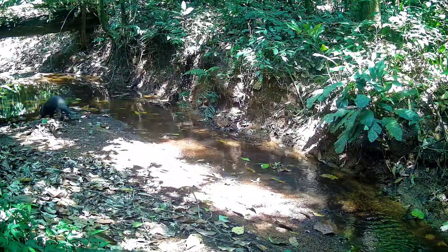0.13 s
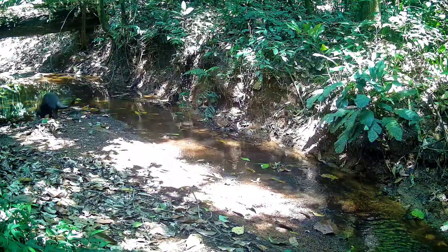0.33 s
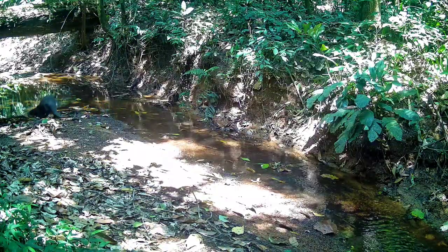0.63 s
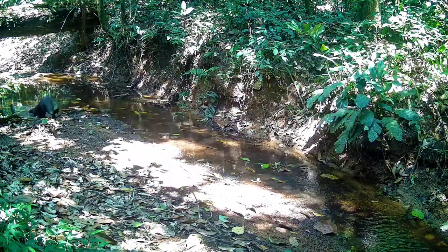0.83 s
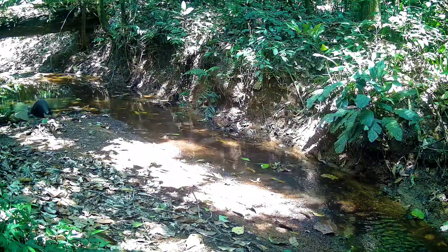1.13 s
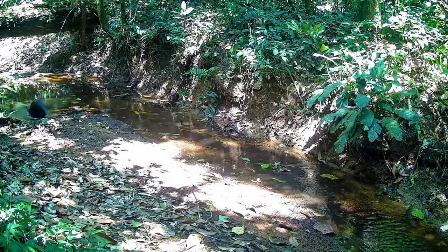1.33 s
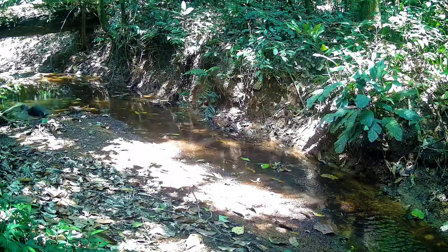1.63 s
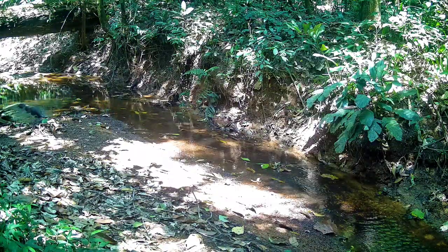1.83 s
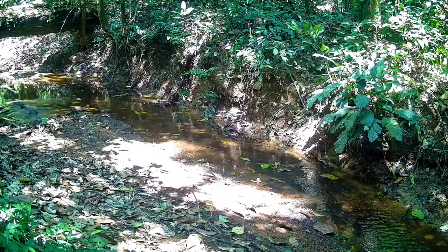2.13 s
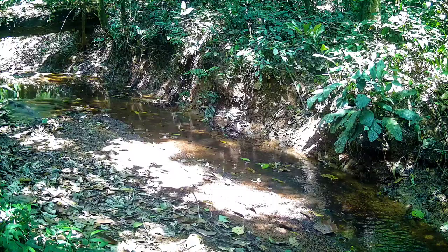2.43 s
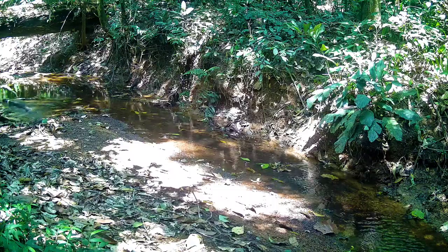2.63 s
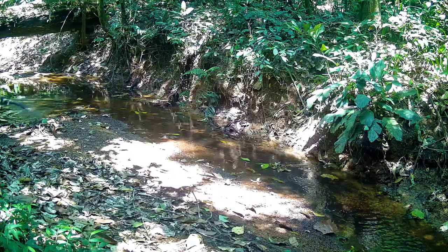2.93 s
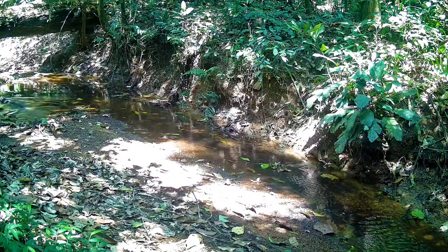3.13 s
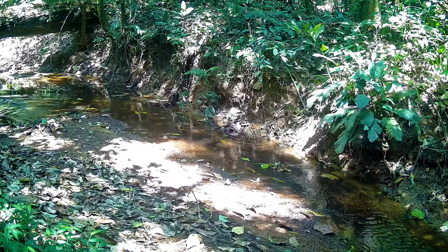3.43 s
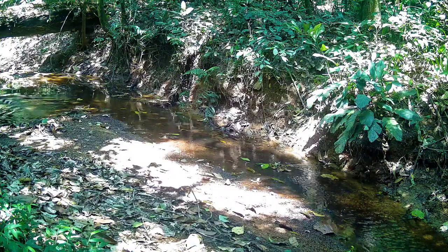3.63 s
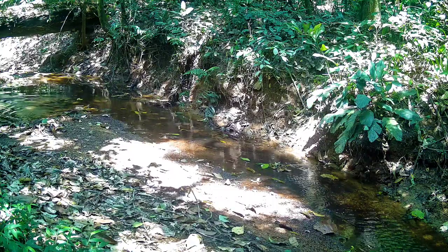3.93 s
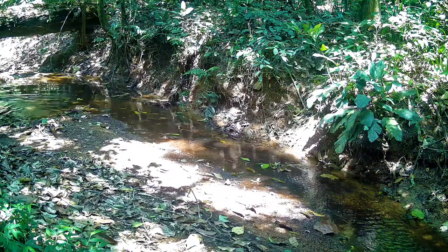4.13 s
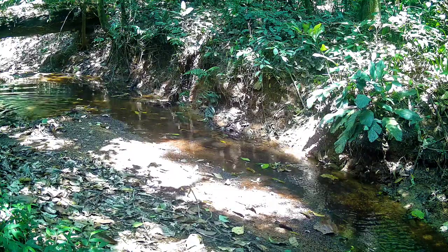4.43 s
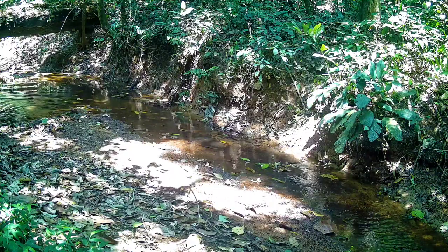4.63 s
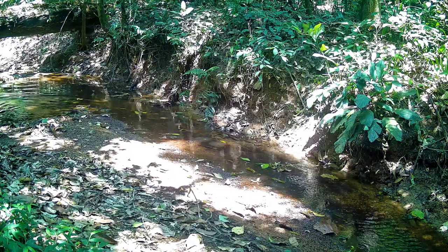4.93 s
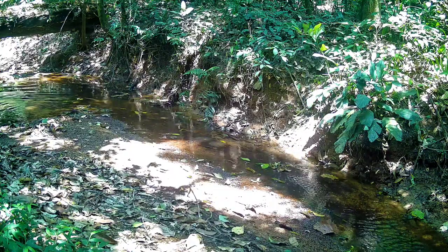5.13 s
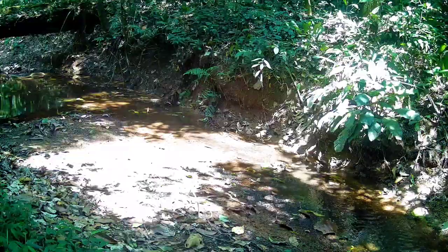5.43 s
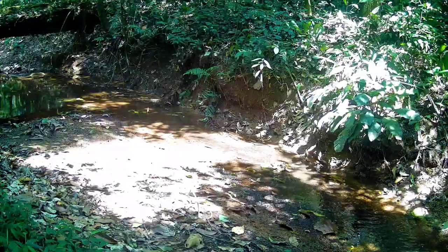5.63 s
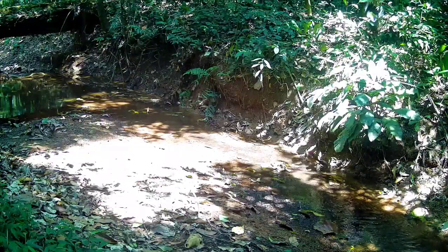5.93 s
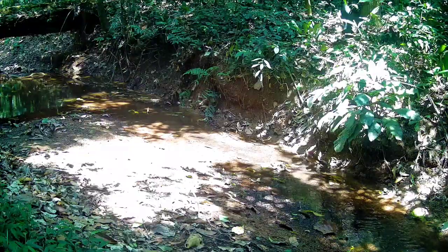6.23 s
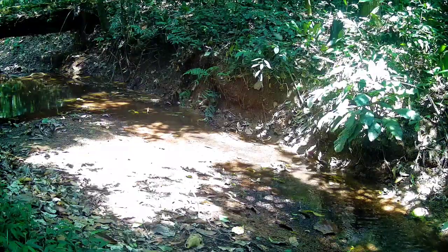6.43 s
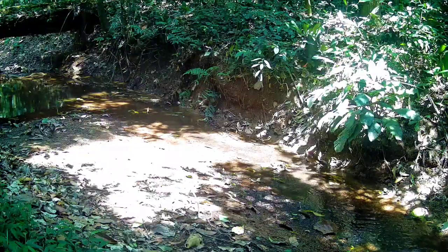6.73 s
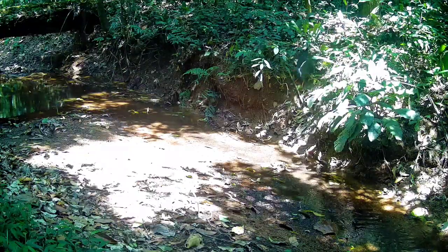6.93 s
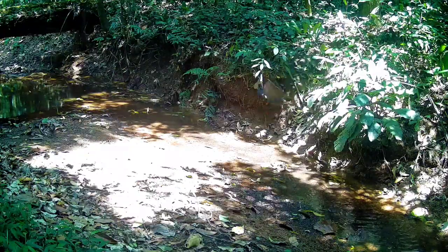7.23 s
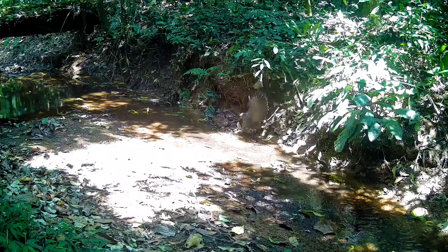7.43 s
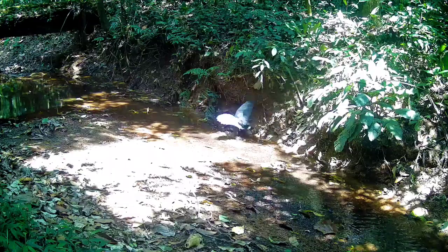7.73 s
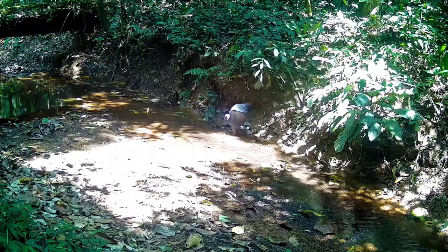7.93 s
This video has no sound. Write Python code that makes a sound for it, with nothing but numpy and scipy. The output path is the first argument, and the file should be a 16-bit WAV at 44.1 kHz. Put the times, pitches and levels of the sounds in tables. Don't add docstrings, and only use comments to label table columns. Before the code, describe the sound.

A dense, high cicada trill holds steadily over a very faint creek. Near the start a close bird gives three quick, descending chips with woodland echo, followed by faint far whistles and soft chips. Around five and a half seconds the trill stops dead with a tiny click. Quiet water remains, with a bird's airy wing swishes, crisp leaf rustles, small twig ticks and a hollow plop. Small narrow-band camera microphone.

```python
import sys
import numpy as np
from scipy import signal
from scipy.fft import rfft, irfft, next_fast_len
from scipy.io import wavfile
from scipy.ndimage import uniform_filter1d

SR = 44100
rng = np.random.default_rng(int(sys.argv[2]) if len(sys.argv) > 2 else 0)


def wav_out(sig):
    wavfile.write(sys.argv[1], SR, np.round(np.clip(np.atleast_2d(sig).T, -1, 1) * 32767).astype(np.int16))


def invert_db(level):
    return 10 ** (np.asarray(level, dtype=float) / 20)


N = 356107
T = np.arange(N) / SR


def shape(x, points):
    hz, db = np.transpose(points)
    size = next_fast_len(len(x))
    f = np.maximum(np.arange(size // 2 + 1) * SR / size, 1)
    gain = invert_db(np.interp(np.log(f), np.log(hz), db))
    return irfft(rfft(x, size) * gain, size)[:len(x)]


def ring(x, hz, width_hz):
    return signal.lfilter(*signal.iirpeak(hz, hz / width_hz, SR), x)


def unit(x):
    return x / np.std(x)


def walk(rate):
    hold = int(SR / rate)
    steps = np.repeat(rng.standard_normal(N // hold + 1), hold)
    return 1.2 * uniform_filter1d(uniform_filter1d(steps, hold), hold)[:N]


def add(out, s, x):
    i = int(s * SR)
    out[i:i + len(x)] += x[:len(out) - i]


def peak_db(t, db, swell, fade):
    return db - 10 * np.where(t < 0, -t / swell, t / fade)


SCATTER_S, SCATTER_DB, SCATTER_RISE_S = .45, -28.5, .004
NEAR_DB_PER_S, NEAR_TREES_S = 94.5, .125
FAR_STEP_DB, FAR_DB_PER_S = -4.5, 85


def scatter(db):
    t = T[:int(SCATTER_S * SR)]
    near = peak_db(t - SCATTER_RISE_S, SCATTER_DB, SCATTER_RISE_S, 10 / NEAR_DB_PER_S)
    far_start = SCATTER_DB - NEAR_DB_PER_S * NEAR_TREES_S + FAR_STEP_DB
    far = far_start - FAR_DB_PER_S * (t - NEAR_TREES_S)
    echo = rng.standard_normal(len(t)) * invert_db(np.where(t < NEAR_TREES_S, near, far) + db)
    echo[0] = 1
    return echo


def note(db, hz, rise, t60, echo_db):
    t = T[:int(.12 * SR)]
    swell = np.sin(np.pi / 2 * np.minimum(t / rise, 1))
    decay = np.exp(-np.log(1000) * np.maximum(t - rise, 0) / t60)
    tone = invert_db(db) * swell * decay * np.sin(2 * np.pi * hz * t)
    return signal.fftconvolve(tone, scatter(echo_db))


# frequency in Hz, level in dB.
CREEK_1 = [(12, -42.5), (20, -16.5), (82, -2), (335, -3.5), (410, -3), (490, -5.5), (627, -3.5),
           (917, -5.5), (2100, -8), (4200, -9.5), (5460, -41), (9240, -120)]
# frequency in Hz, level in dB.
CREEK_2 = [(12, -49), (20, -15.5), (92, -1.5), (371, -2.5), (410, -2), (553, -2), (728, -2), (805, -2),
           (1540, -4.5), (3980, -10.5), (4620, -11.5), (6390, -11), (7800, -31), (10100, -62),
           (17200, -120)]


def creek(colour, flow_db, flicker_db):
    noise = unit(shape(rng.standard_normal(N), colour))
    murmur = 0
    for hz in 30 * 2. ** np.arange(9):
        below = [(hz / 2, -90), (hz / 1.99, -30), (hz / 1.5, -7.5)]
        above = [(hz * 1.33, -4.5), (hz * 1.9, -24), (hz * 2, -90)]
        band = shape(noise, below + [(hz, 0)] + above)
        murmur = murmur + band * invert_db(flicker_db * walk(9))
    return murmur * invert_db(flow_db + 4)


# peak time in seconds, peak in dB, seconds per 10 dB of swell, seconds per 10 dB of fade.
SWISH = [
    (5.635, -65, 0.12, .04),
    (6.05, -64.5, 0.66, .5),
    (6.485, -52, .03, .02),
    (6.6, -58.5, 0.14, .3),
    (6.975, -51, 0.0046, 0.022),
    (6.96, -61.5, 0.18, .3),
    (7.33, -59, 0.6, 0.28),
    (7.585, -61.5, .04, .1),
    (7.65, -62, .1, .7),
]


def swish():
    air = rng.standard_normal(N) * invert_db(1.5 * walk(60))
    hiss = unit(shape(air, [(700, -27), (1600, -7.5), (3000, -0.5), (5000, -3), (7500, -22.0)]))
    power = sum(invert_db(peak_db(T - s, db, swell, fade)) ** 2 for s, db, swell, fade in SWISH)
    return hiss * np.sqrt(power)


# peak time in seconds, peak in dB, pitch in Hz,
# seconds per 10 dB of swell, seconds per 10 dB of fade.
WHISTLES = [
    (1.15, -59, 2250, .085, .012),
    (1.27, -66, 2195, .01, .04),
    (1.338, -58, 2210, .02, .012),
    (1.385, -69.5, 2160, .04, .03),
    (1.505, -66.5, 2105, .03, .02),
    (1.6, -68, 2100, .03, .02),
    (1.478, -63, 1836, .04, .07),
    (5.885, -68, 4320, .03, .03),
]
WHISTLE_RANGE_DB, SAG_HZ_PER_S = 15, 360
SCOOP_END_S, SCOOP_HZ, SCOOP_S = 1.03, 566, .035


def far_birds():
    out = np.zeros(N)
    waver = 1 + 0.0055 * walk(60)
    flutter = invert_db(2.2 * walk(40))
    scoop_hz = SCOOP_HZ * np.exp(-np.maximum(T - SCOOP_END_S, 0) / SCOOP_S)
    for s, db, hz, swell, fade in WHISTLES:
        pitch = hz - scoop_hz - SAG_HZ_PER_S * np.clip(T - s, 0, 1)
        phase = 2 * np.pi * np.cumsum(pitch * waver) / SR
        level_db = peak_db(T - s, db, swell, fade)
        edge = np.clip((level_db - db + WHISTLE_RANGE_DB) / 3, 0, 1)
        voice = np.sin(phase) + invert_db(-16) * np.sin(2 * phase)
        out += edge * invert_db(level_db + 6.5) * flutter * voice
    return signal.fftconvolve(out, scatter(db=-10.5))[:N]


# start in seconds, peak in dB, pitch in Hz, echo in dB.
FAR_CHIPS = [
    (1.055, -59, 3770, -10),
    (2.55, -54, 2120, -11),
    (2.569, -48, 2180, -14),
    (2.572, -46, 2340, -15),
    (3.645, -52.5, 2420, -1),
    (3.658, -51, 2210, -3),
    (1.43, -55, 2250, -1),
]


def far_chips():
    out = np.zeros(N)
    for s, db, hz, echo_db in FAR_CHIPS:
        add(out, s, note(db, hz, .004, 0.03, echo_db))
    return out


# start in seconds, peak in dB, pitch in Hz, seconds to ring down by 60 dB.
PLOPS = [(0.888, -48.5, 1146, 0.032), (1.07, -50, 654, 0.03), (1.251, -54, 110, 0.09),
         (6.448, -44.5, 640, 0.059), (6.474, -40.5, 625, 0.021), (7.357, -48, 920, 0.018),
         (7.411, -52.5, 905, 0.084), (7.575, -48, 1105, .04), (7.586, -29, 1077, 0.027),
         (7.69, -42, 1060, 0.0076), (7.744, -43, 724, 0.018)]


def plops():
    out = np.zeros(N)
    for s, db, hz, t60 in PLOPS:
        add(out, s, note(db, hz, 0.14 * t60, t60, -18.5))
    return out


# start in seconds, peak in dB, pitch in Hz, seconds to ring down by 60 dB.
TICKS = [
    (5.622, -48, 3200, .002),
    (5.63, -54, 2800, .012),
    (5.638, -48, 2500, .002),
    (6.974, -51, 3000, .002),
    (7.662, -44, 3950, 0.019),
    (7.667, -42, 4350, 0.0088),
    (7.697, -46, 4400, .011),
    (7.72, -47, 3000, .006),
    (7.905, -52, 5530, 0.022),
    (7.948, -50, 2650, .02),
]


def ticks():
    out = np.zeros(N)
    for s, db, hz, t60 in TICKS:
        add(out, s, note(db, hz, 0.071 * t60, t60, -10))
    return out


# peak time in seconds, peak in dB, centre in Hz, length in seconds, pitch spread in octaves.
RUSTLES = [(5.629, -56, 3330, .05, 1.28), (6.462, -50, 4870, .07, 0.38), (6.475, -35.5, 5070, .018, 0.29),
           (6.483, -41.5, 4600, .03, 0.44), (6.495, -44.5, 5460, 0.041, .33), (6.52, -56, 5100, 0.22, 0.36),
           (6.61, -53, 5100, 0.063, 0.43), (6.973, -36, 4900, .014, 0.35), (6.981, -41.5, 5350, 0.042, .28),
           (7.0, -61, 4900, 0.085, .28), (7.037, -59, 4600, .016, .28), (7.285, -58.5, 4640, 0.076, .58),
           (7.326, -53, 4900, .02, .4), (7.361, -51.5, 4900, .035, 0.46), (7.386, -55, 5100, 0.021, 0.34),
           (7.566, -52, 4260, .03, 1.0), (7.577, -52, 3600, 0.033, .5), (7.589, -54, 4300, 0.028, 0.85)]
RUSTLE_RISE_SHARE, RUSTLE_RANGE_DB = .4, 19


def leaves(per_s=3600, spread_db=1.5):
    out, t = np.zeros(N), T[:int(.0045 * SR)]
    for s, db, hz, length, spread in RUSTLES:
        chance = rng.random((1300, 4))[:int(per_s * length)]
        at = length * (chance[:, 0] - RUSTLE_RISE_SHARE)
        pitch = hz * 2 ** (spread * (chance[:, 1] - chance[:, 2]))
        per_10_db = 10 * length / RUSTLE_RANGE_DB
        level_db = peak_db(at, db, RUSTLE_RISE_SHARE * per_10_db, (1 - RUSTLE_RISE_SHARE) * per_10_db)
        size = invert_db(level_db - spread_db * np.log(chance[:, 3] + 0.027) - 0.5)
        for start, p, gain in zip(s + at, pitch, size):
            envelope = (1 - np.exp(-t * p / 0.78)) * np.exp(-t * p / 6.0)
            add(out, start, gain * np.sin(2 * np.pi * p * t) * envelope)
    return out


# time in seconds, level in dB.
CHORUS = [(0.0, -43), (1.2, -44.5), (4.1, -43.5), (4.3, -44.5), (5.4, -44)]
# frequency in Hz, width in Hz, level in dB.
TYMBAL = [(5317, 160, 5), (5144, 260, -3.5), (5530, 190, -10), (5830, 320, -11), (4520, 180, -20),
          (6700, 540, -33)]


def cicadas(count=6, click_hz=330, throb_hz=42, throb_db=-3.0, jitter=.3):
    clicks = np.zeros(N)
    for own in 1 + .04 * rng.standard_normal(count):
        chance = rng.standard_normal((4000, 2))
        s = np.cumsum((1 + jitter * np.tanh(chance[:, 0])) / (click_hz * own))
        size = invert_db(throb_db * np.sin(2 * np.pi * throb_hz * own * s) + 3.5 * chance[:, 1])
        heard = s < T[-1]
        np.add.at(clicks, (s[heard] * SR).astype(int), size[heard])
    t = T[:int(.03 * SR)]
    smear = rng.standard_normal(len(t)) * np.exp(-t / 0.0018)
    clicks = signal.fftconvolve(clicks, smear)[:N]
    far = rng.standard_normal(N)
    drive = unit(clicks - clicks.mean()) + invert_db(6.0) * far
    song = np.zeros(N)
    for k, (hz, width, db) in enumerate(TYMBAL):
        others = np.roll(drive, N // 7 * k)
        song += invert_db(db) * ring(ring(others, hz, 1.77 * width), hz, 1.76 * width)
    level_db = np.interp(T, *np.transpose(CHORUS))
    return unit(song) * invert_db(level_db + 0.98 + 0.5 * walk(25))


# start in seconds, peak in dB, starting pitch in Hz, scatter in dB.
CHIPS = [
    (.573, -27.5, 4780, -3),
    (0.711, -28, 4480, -1.5),
    (0.846, -30, 4130, 0),
]
# chip start in seconds, delay in seconds, level in dB.
TRUNKS = [
    (.573, 0.0083, 4),
    (.573, 0.0365, 2.5),
    (.573, 0.055, -8),
    (.710, 0.019, -4),
    (.710, 0.036, -4),
    (.710, 0.055, -7),
    (.845, 0.035, -6.5),
    (.845, 0.12, -13),
]
CHIP_END_HZ, CHIP_FALL_S = 2520, 0.0088
TRUNK_NARROWING, LEAFY_HZ, RASP_DB = 2.1, 4100, 1


def near_bird():
    out, t = np.zeros(N), T[:int(.04 * SR)]
    for s, db, start_hz, wet_db in CHIPS:
        falling = 0.0018 * np.logaddexp(0, (t - .005) / 0.0016)
        pitch = CHIP_END_HZ + (start_hz - CHIP_END_HZ) * np.exp(-falling / CHIP_FALL_S)
        phase = 2 * np.pi * np.cumsum(pitch) / SR
        rise = invert_db(db + 1.0) * np.sin(np.pi / 2 * np.minimum(t / 0.0038, 1)) ** 2
        head = np.exp(-(t / 0.0076) ** 2)
        rasp = invert_db(-9 + RASP_DB * walk(500)[:len(t)])
        tail = rasp * np.exp(-t / 0.015) * np.cos(np.pi / 2 * t / t[-1])
        octave = invert_db(7.5) * tail * (1 - np.exp(-(t / 0.018) ** 4)) * np.sin(2 * phase)
        echo = scatter(wet_db)
        echo[1:] *= invert_db(1.8 * walk(120)[1:len(echo)])
        far = np.clip((T[:len(echo)] - .055) / 0.028, 0, 1)
        echo = (1 - far) * echo + ring(far * echo, LEAFY_HZ, 910.0)
        add(out, s, signal.fftconvolve(rise * (head + tail) * np.sin(phase), echo))
        add(out, s, signal.fftconvolve(rise * octave, echo[1:]))
        for chip_s, delay, echo_db in TRUNKS:
            if abs(chip_s - s) < .05:
                add(out, s + delay, invert_db(echo_db) * rise * head ** TRUNK_NARROWING * np.sin(phase))
    return out


CUT_S, CUT_CLICK_DB, SPLICE_S = 5.44962, -38, .0004
# frequency in Hz, level in dB.
CAMERA = [(20, -1.5), (6000, 0), (7000, -0.5), (7600, -7.5), (8100, -17.5), (8500, -60.5)]


def scene():
    calls = near_bird() + far_birds() + far_chips() + plops() + ticks() + leaves()
    edge_db = CREEK_1[-2][1]
    treble = [(5500, edge_db - 1.5), (8200, edge_db - 4.0)]
    first = cicadas() + creek(CREEK_1[:-2] + treble, flow_db=-60, flicker_db=1.0)
    first = shape(first, CAMERA) * np.clip((CUT_S - T) / SPLICE_S, 0, 1)
    second = creek(CREEK_2, flow_db=-59.5, flicker_db=0.64) + swish()
    second = shape(second, [(7000, 1.5), (8000, -5.0), (8400, -24), (9000, -60)])
    return (np.where(T < CUT_S, first, second) + shape(calls, CAMERA))[None]


def low_pass(x):
    return signal.sosfilt(signal.butter(12, 15700, fs=SR, output="sos"), x)


def record(dry):
    x = dry + invert_db(-98.0) * rng.standard_normal(dry.shape)
    x[:, int(CUT_S * SR)] += invert_db(CUT_CLICK_DB)
    return low_pass(x)


dry = scene()
out = record(dry)
wav_out(out)
```